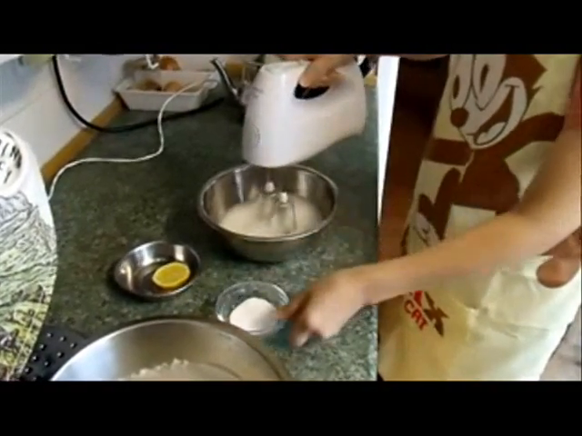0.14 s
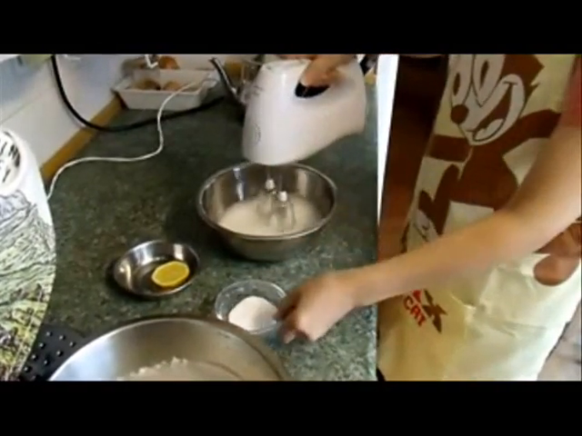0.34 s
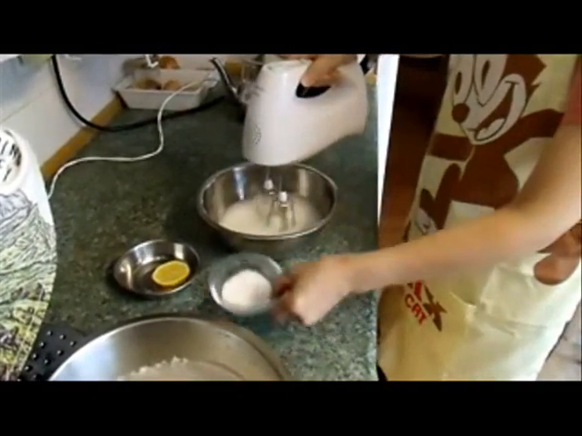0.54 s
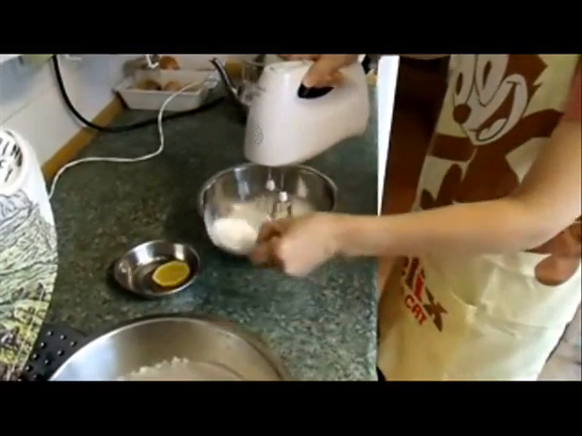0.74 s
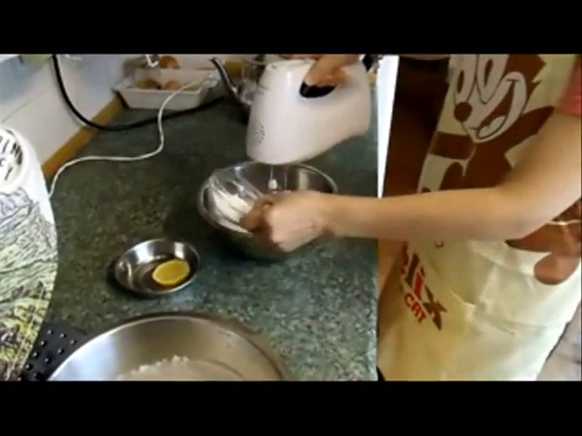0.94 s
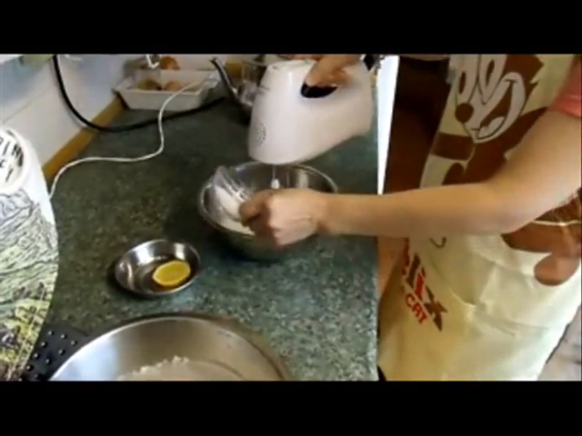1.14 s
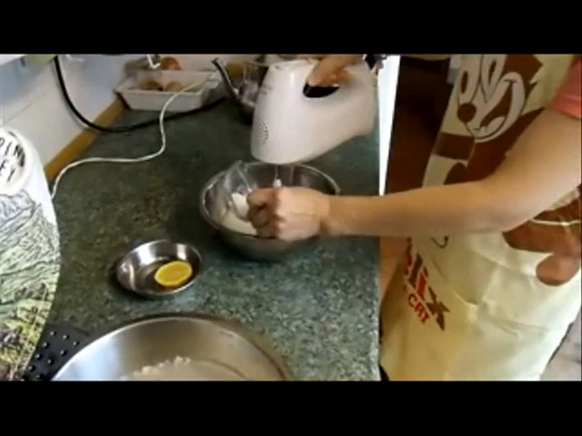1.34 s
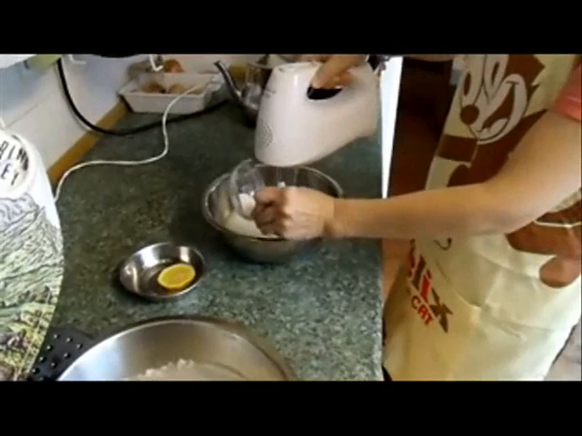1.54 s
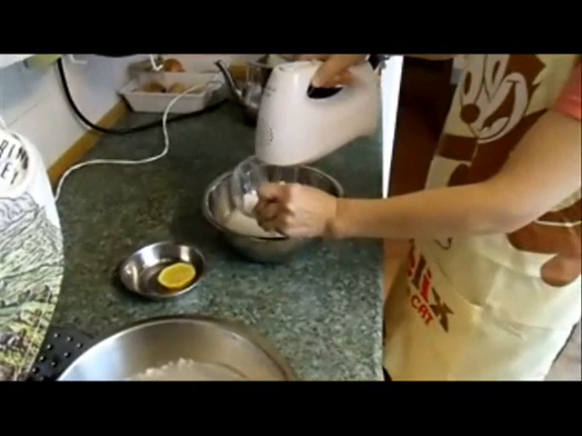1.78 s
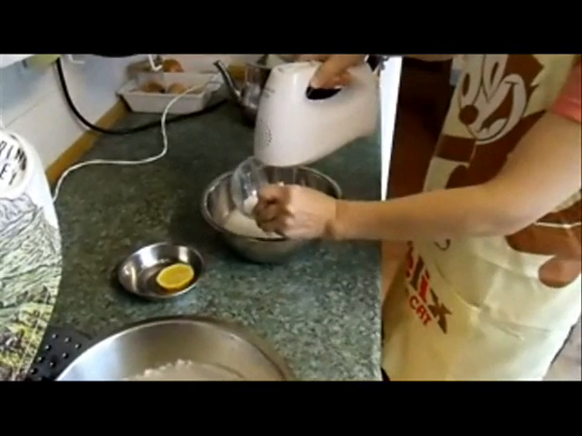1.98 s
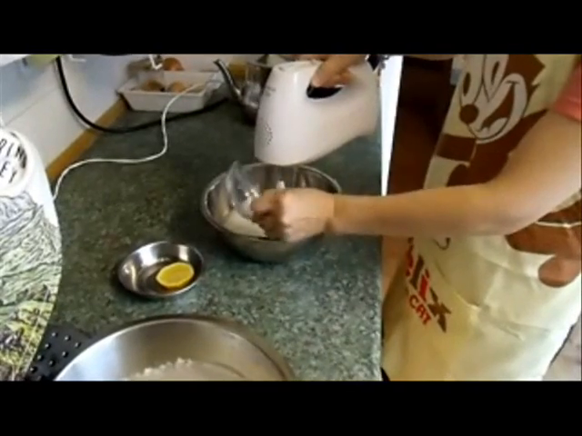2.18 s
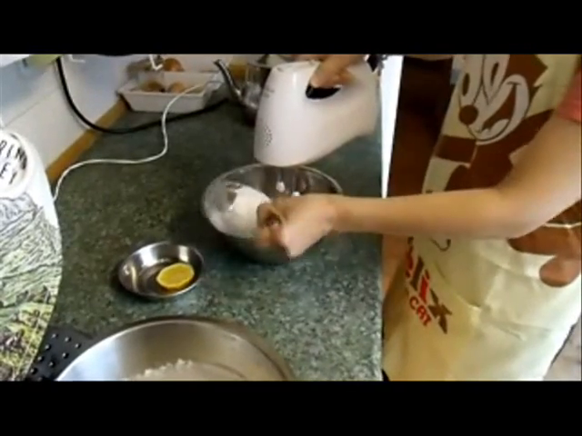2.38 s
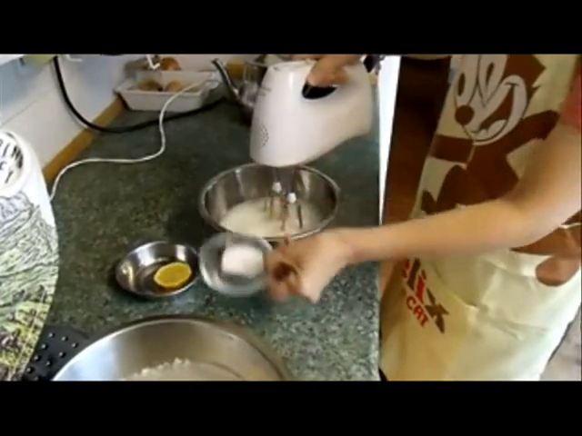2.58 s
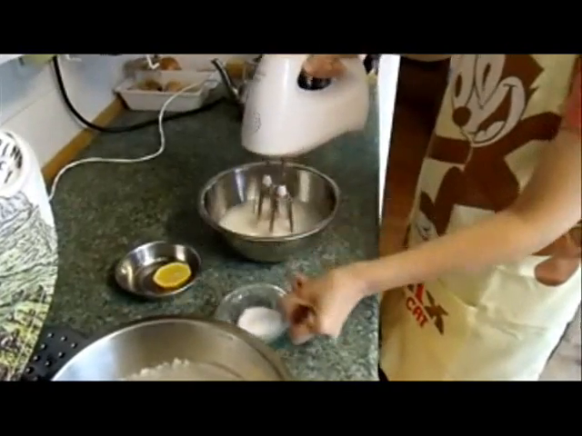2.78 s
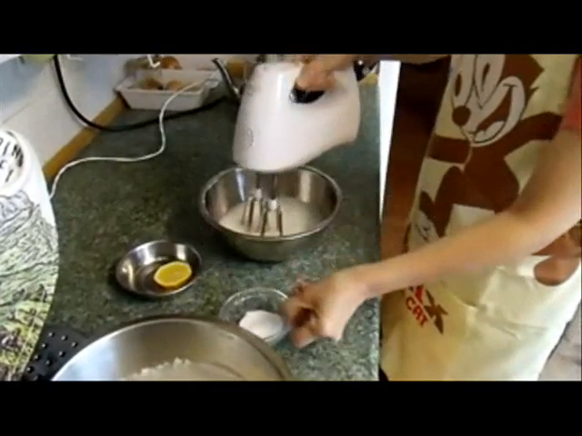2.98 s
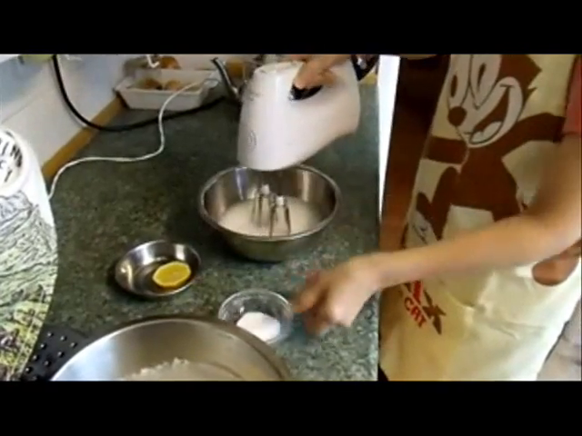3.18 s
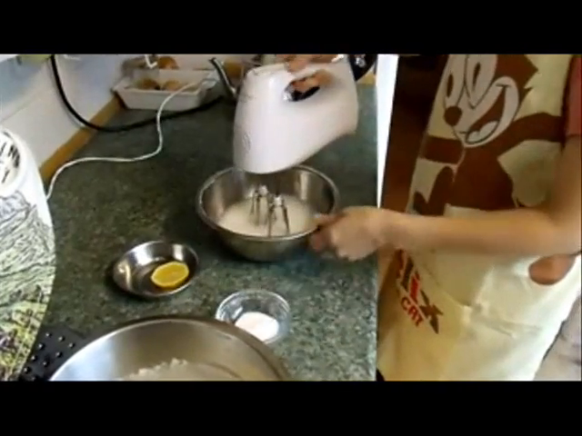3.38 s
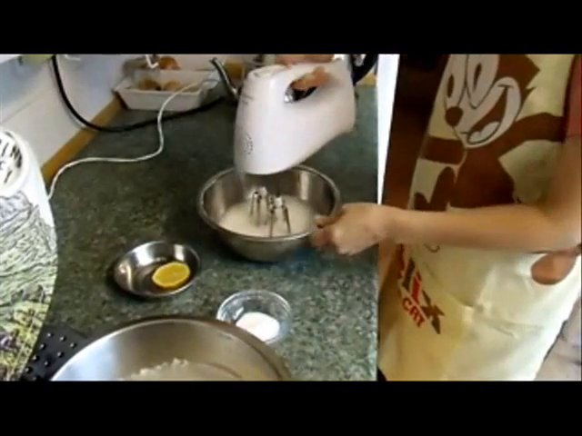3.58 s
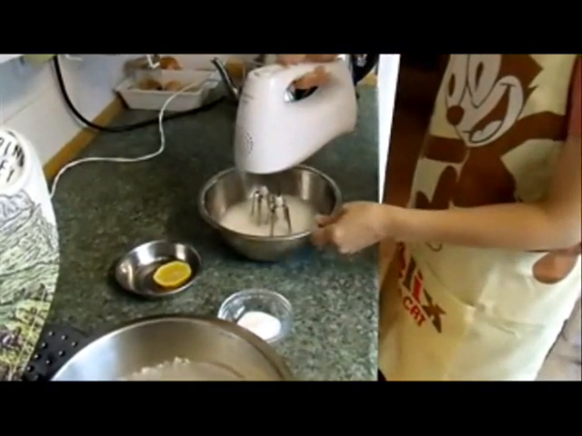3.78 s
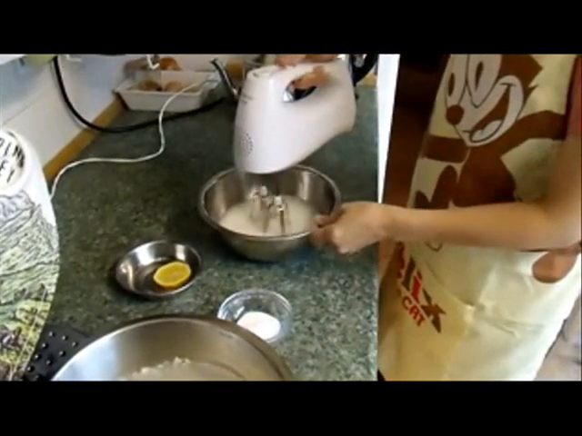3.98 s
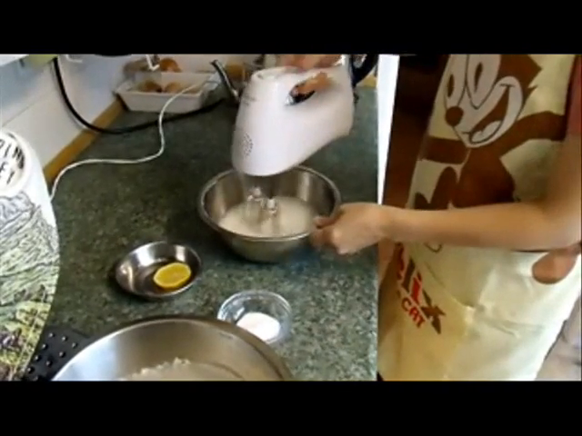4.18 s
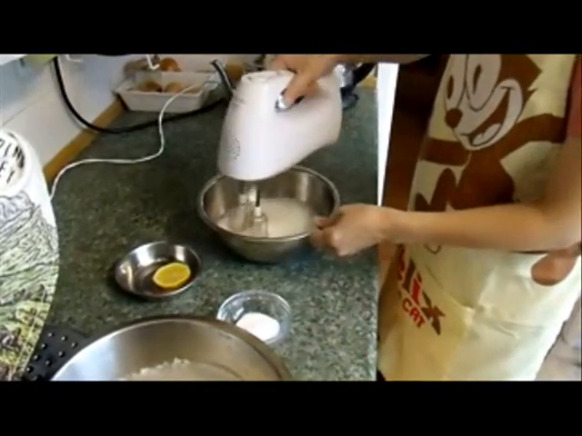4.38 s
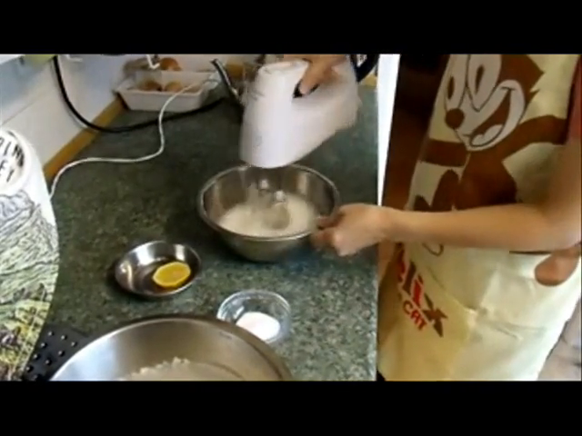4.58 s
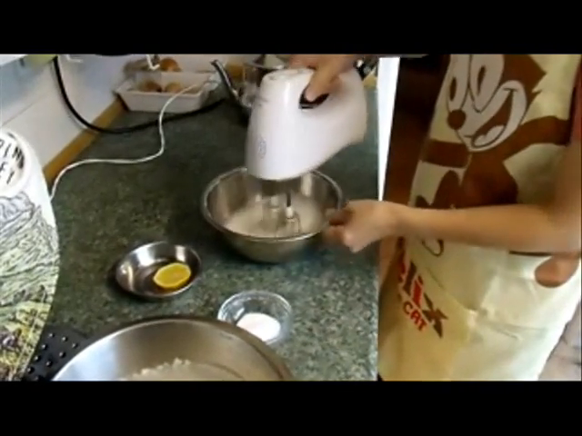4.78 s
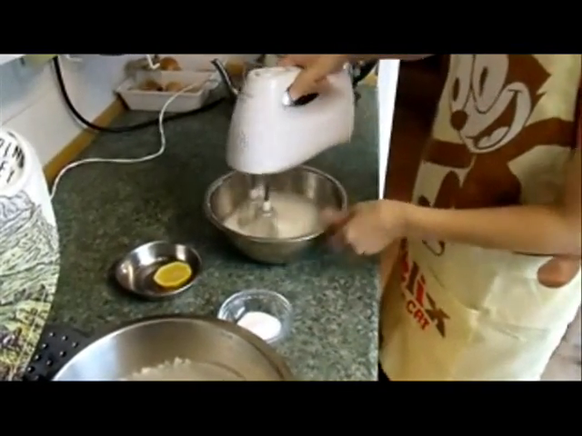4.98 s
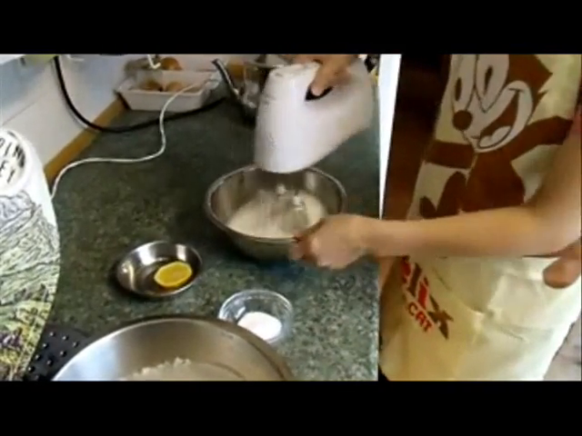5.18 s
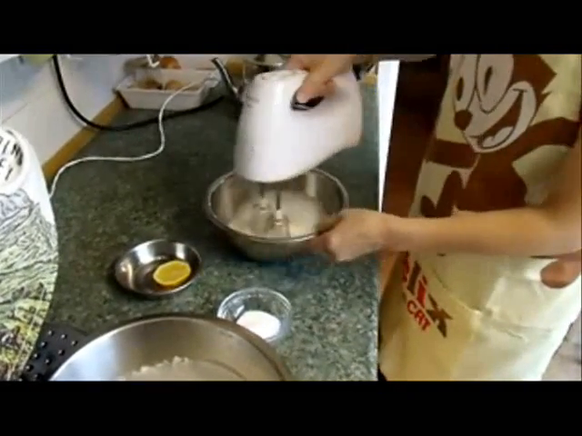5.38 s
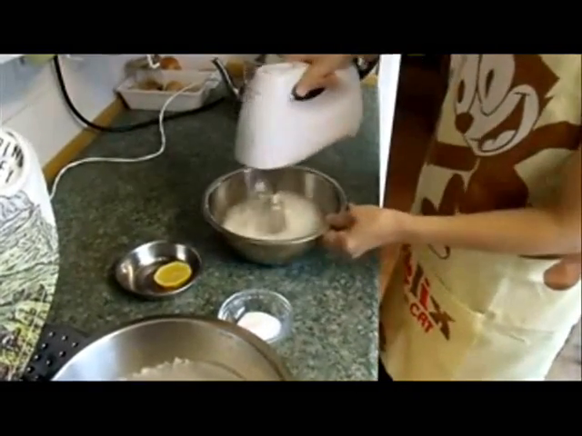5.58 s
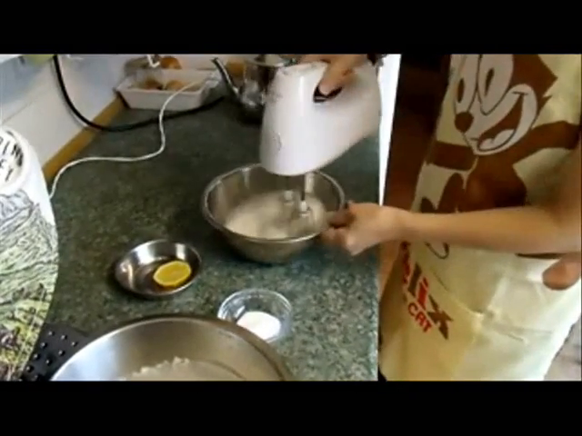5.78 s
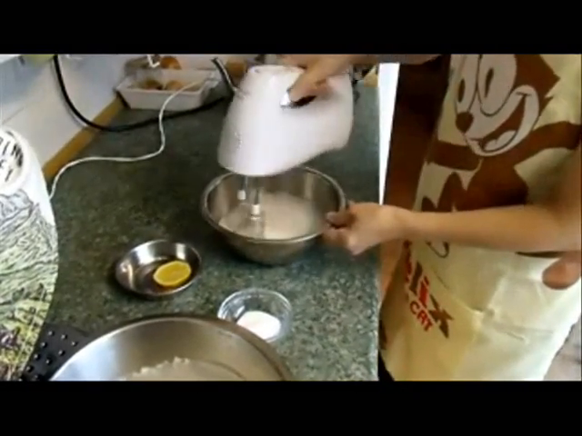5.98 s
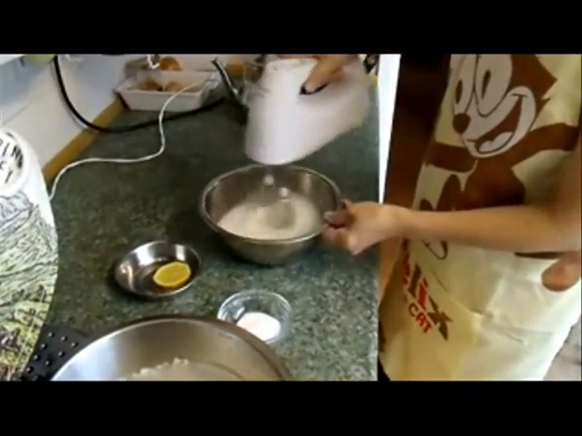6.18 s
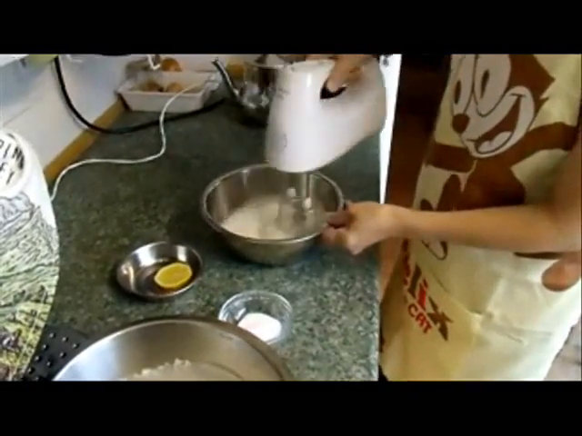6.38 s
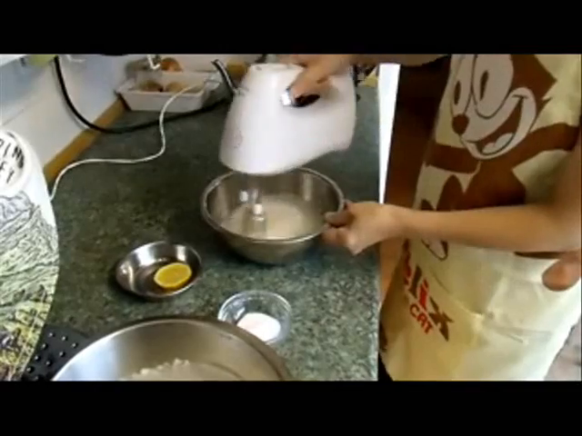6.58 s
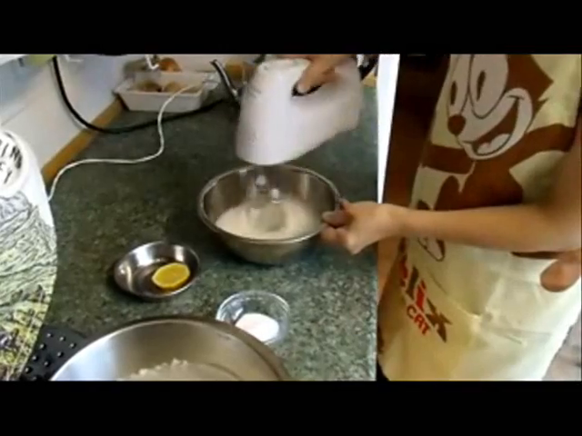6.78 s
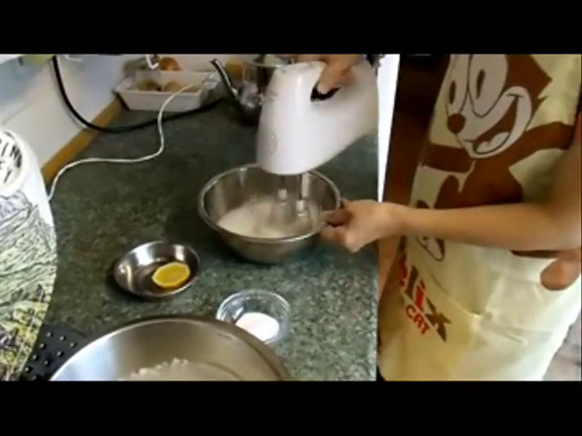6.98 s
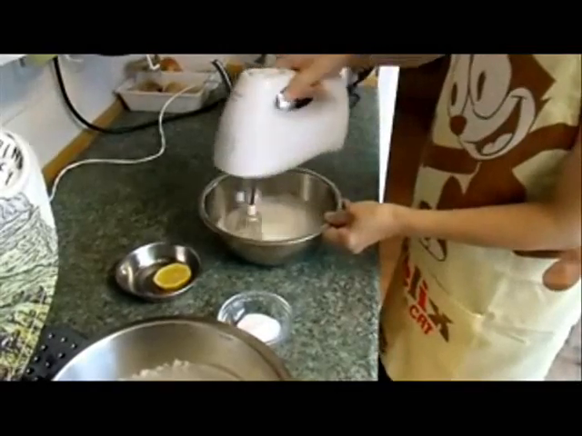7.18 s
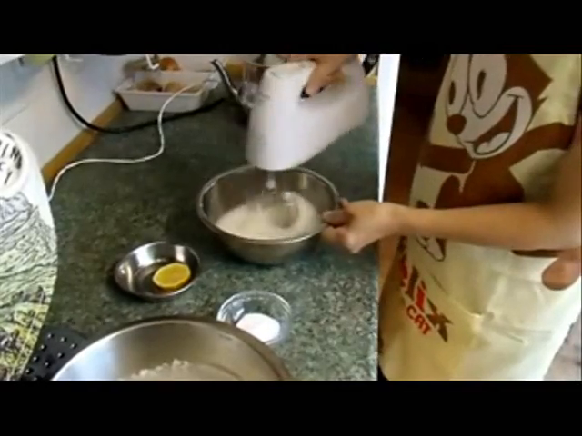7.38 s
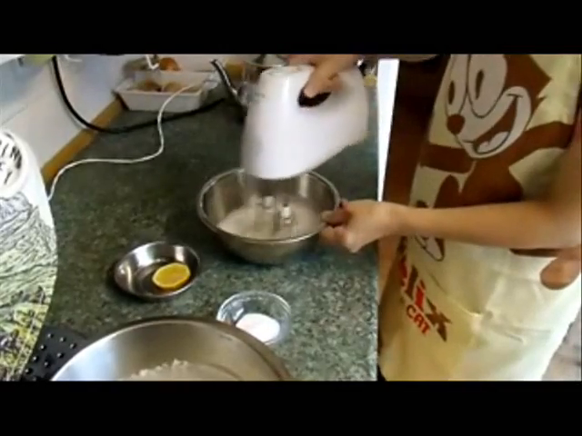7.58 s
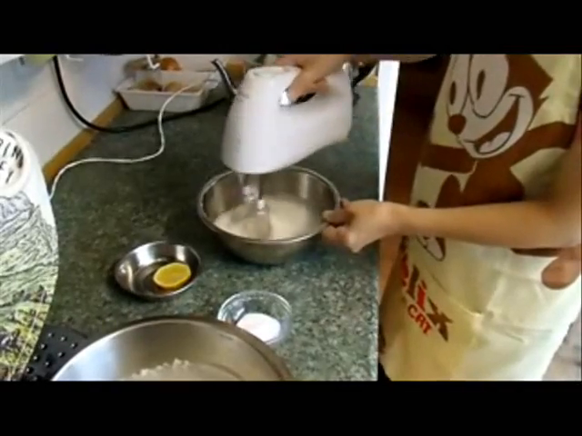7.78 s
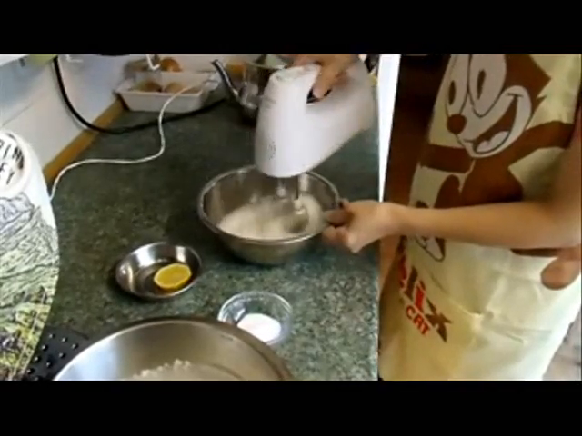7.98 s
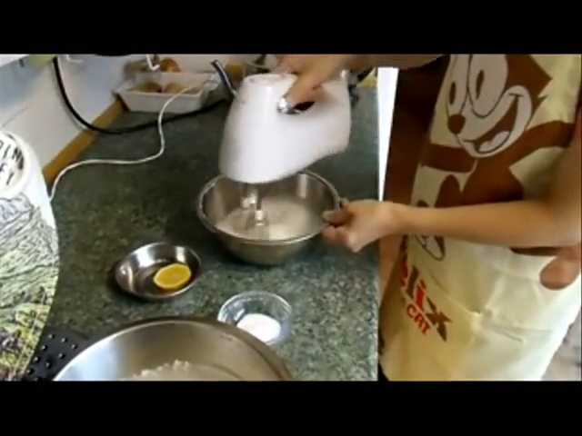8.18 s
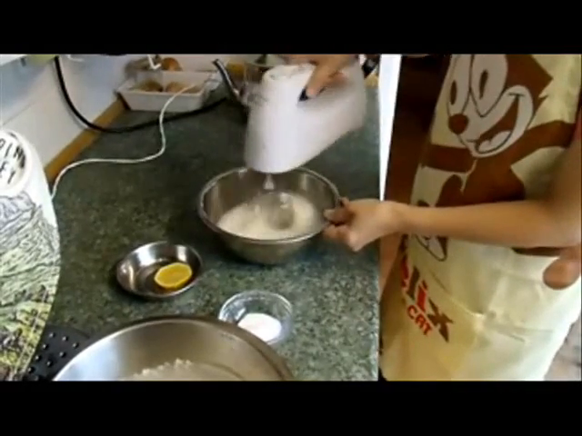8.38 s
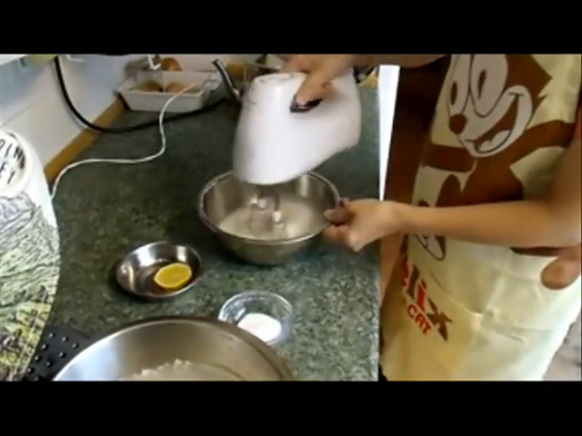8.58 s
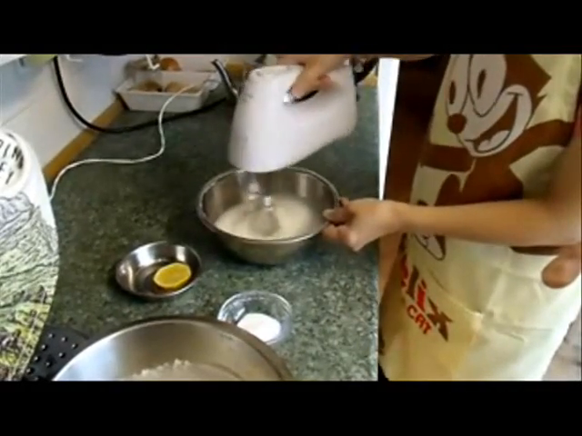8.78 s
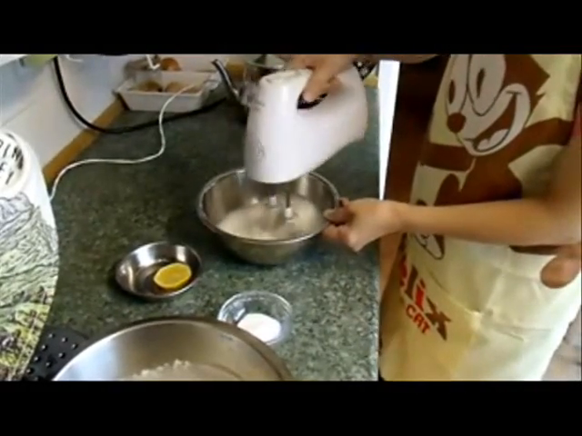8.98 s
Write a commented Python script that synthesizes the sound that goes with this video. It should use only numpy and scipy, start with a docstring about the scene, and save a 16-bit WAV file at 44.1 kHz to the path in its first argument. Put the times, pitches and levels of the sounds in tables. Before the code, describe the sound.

Close in a small hard-walled kitchen, an electric hand mixer coasts down, its buzzy whine falling to nothing with soft bowl taps. A quiet gap with faint hum follows, then a glass dish knocks down on the counter with a fine sugar hiss. The mixer restarts with a gear jolt, climbs quickly to a loud, high whine, and its beaters clatter in irregular bursts against a ringing steel bowl until the end.

```python
"""In a kitchen, close to the worktop: an electric hand mixer coasts to a stop over a steel bowl.
A glass dish of sugar is set down, then the mixer whines up again and its beaters clatter in bursts.
Commutator tones and brush noise follow one speed curve; blows are shaped noise through resonances.
Hum, room air and a short hard-walled reverberation lie behind; the close microphone overloads on the loudest blows."""
import sys
import numpy as np
from scipy import signal
from scipy.fft import rfft, irfft, next_fast_len
from scipy.io import wavfile
from scipy.ndimage import map_coordinates

SR = 44100
rng = np.random.default_rng(int(sys.argv[2]) if len(sys.argv) > 2 else 0)


def put_to_file(sound):
    """Save the sound as 16-bit audio at rate SR, in the file named by the first command-line argument."""
    columns = np.atleast_2d(sound).T  # one column per channel
    safe = np.clip(columns, -1, 1)
    whole_steps = np.round(safe * 32767)
    wavfile.write(sys.argv[1], SR, whole_steps.astype(np.int16))


N = 398663
TIME = np.arange(N) / SR  # seconds
TOP_HZ = 15750  # the microphone's band limit

# Levels in tables are relative: the functions below add offsets or scale the layer.
# Room air spectrum: pitch_hz, level_db (per Hz)
AIR_SPECTRUM = [(25, -18), (66, -7.5), (100, -21), (150, -3), (200, -9), (317, -11.5), (531, -5.5),
                (624, -7), (1290, -14.5), (1610, -10.5), (2400, -11), (3400, -15), (4300, -21.5),
                (6500, -22.5), (10000, -28), (16000, -28.5)]
# Steady kitchen hum and a thin electrical whistle: pitch_hz, level_db
HUM_TONES = [(100, -53.5), (199.5, -57), (516, -58), (537, -49.5), (931, -56.5), (1486, -57), (2350, -57),
             (3408, -60), (11719, -56.5)]
# Reverberation of the kitchen: pitch_hz, t60_s
KITCHEN_DECAY = [(150, 0.54), (1500, 0.34), (6000, 0.37), (15000, 0.67)]

# Motor coasting without power: time_s, commutator_hz
COAST_SPEED = [(0, 2189), (.348, 1706), (.732, 1192), (1.094, 745), (1.304, 510), (1.68, 20)]
# Motor under power: time_s, commutator_hz
DRIVE_SPEED = [(4.06, 100), (4.12, 750), (4.21, 1530), (4.31, 2060), (4.38, 2300), (4.6, 2720), (4.8, 3000),
               (5.0, 3170), (5.2, 3280), (5.6, 3430), (7.3, 3610), (9.04, 3665)]
# Brush noise spectrum while coasting: pitch_hz, level_db (per Hz)
COAST_SPECTRUM = [(60, -19), (250, -9), (480, 1), (900, 1.5), (1700, 3.5), (2250, 0), (2600, -13),
                  (3300, -5), (4500, -5), (6200, -10), (7200, -6), (10200, -13.5), (12500, -7.5),
                  (16000, -18)]
# Brush noise spectrum under power: pitch_hz, level_db (per Hz)
DRIVE_SPECTRUM = [(60, -40), (250, -7), (480, 0), (900, -1.5), (1700, 3.5), (2250, 4.5), (2600, -7),
                  (3200, -2.5), (4400, -1), (6200, -11.5), (7200, -6.5), (10200, -15), (12500, -10.5),
                  (16000, -22)]
# Housing response that the commutator tones sweep through: pitch_hz, level_db
HOUSING_RESPONSE = [(200, -14), (900, 3.5), (1700, -7), (2200, 4.5), (2650, -12), (3300, 0.5), (4600, 2.5),
                    (5600, -2.5), (6200, -7.5), (7200, -0.5), (10000, -9.5), (11000, -7.5), (13000, -7),
                    (16000, -14)]
# Resonances of the mixer's plastic shell: pitch_hz, width_hz, level_db
SHELL_MODES = [(474, 110, -1.5), (1160, 30, 1.5), (1680, 220, -5.5), (2250, 260, -6.5), (2780, 78, 2),
               (3070, 95, 4), (3274, 93, -1.5), (4340, 400, 2), (4680, 84, 5.5), (5630, 180, 4),
               (7040, 190, 1.5), (9040, 160, 3.5), (10700, 100, -11), (13100, 250, -11)]
# Thin ring of the beater wires: pitch_hz, width_hz, level_db
WIRE_MODES = [(4060, 150, 5), (4660, 150, 5), (3500, 140, -2)]

# Light taps and scuffs on the bowl, the dish and the switch: start_s, level_db, treble_db, rise_s
TAP_TIMES = [(1.227, -16.5, 0, .004), (1.3, -13.5, -6, 0.0096), (1.367, -22, -1, .005),
             (1.458, -14, -7, 0.0063), (2.539, -28, -1, .001), (2.79, -23, -8, .005),
             (3.17, -4.5, -4, 0.0083), (3.42, -19.5, 3, .002), (3.433, -15, 1, 0.0047),
             (4.059, -12, -4, .002)]
# Light scuffs on steel and glass: pitch_hz, level_db (per Hz)
SCUFF_SPECTRUM = [(1500, -27), (3000, 2), (4200, 6), (5500, -1), (6500, -3), (7700, 1), (10500, -11),
                  (12500, -6), (16000, -17)]

# Glass dish rocking onto the counter: start_s, level_db
DISH_KNOCKS = [(3.026, 2), (3.085, 0), (3.11, -3), (3.123, -7), (3.241, -5), (3.248, 2)]
# The counter's answer to the dish: pitch_hz, level_db (per Hz)
KNOCK_SPECTRUM = [(30, -39), (150, -18), (300, -12), (400, -15), (550, -14), (740, -2.5), (950, -5.5),
                  (1100, 0), (1400, -5), (1750, -4), (2120, -8), (2450, -23), (3300, -22.5), (4200, -36),
                  (5150, -36), (7000, -37), (16000, -55)]
# Bright snap of the glass: pitch_hz, level_db (per Hz)
GLASS_SPECTRUM = [(500, -20), (3000, -6), (4200, -6), (5200, 0), (6500, -8), (12000, -23), (16000, -18)]
# Counter resonances under the dish: pitch_hz, width_hz, level_db
COUNTER_MODES = [(310, 61, -2), (800, 95, 1), (1140, 37, 2), (1440, 35, -5), (1710, 73, -9), (2110, 75, -6)]
# Counter shuddering under the hands: start_s, level_db, rise_s
COUNTER_THUDS = [(3.19, -28, .012), (3.25, -40, .008), (3.4, -43, 0.045)]
# Low thud of the counter: pitch_hz, level_db (per Hz)
THUD_SPECTRUM = [(20, -2), (45, -10), (90, -3.5), (170, -7), (300, -29), (800, -56)]
# Sugar grains sliding in the dish: pitch_hz, level_db (per Hz)
SUGAR_SPECTRUM = [(4000, -25), (6500, -7), (9000, 2), (10800, -8), (13200, -2), (16000, -13)]

# Gear rattle: pitch_hz, level_db (per Hz)
GEAR_SPECTRUM = [(100, -32), (330, -31), (500, -3.5), (760, -5), (1100, -5.5), (2100, -1), (2600, -16.5),
                 (4500, -15.5), (7000, -24), (16000, -35)]
# Beaters stirring along the bottom of the bowl: time_s, contact_db
STIR_CONTACT = [(4.44, -21), (4.6, -24.5), (4.79, -33), (5.1, -27), (5.28, -35), (5.5, -22.5),
                (6.45, -25.5), (6.7, -26), (7.6, -30), (8.0, -26.5), (8.25, -21), (8.55, -28.5),
                (9.04, -31.5)]
# Beaters pushed against the bowl's wall: start_s, length_s, body_db, edge_db
WALL_BURSTS = [(4.451, 0.043, -14, -20), (4.495, 0.018, -11, -17.5), (4.701, .03, -20, -24.5),
               (4.827, 0.078, -12, -19), (4.958, .005, -16, -20.5), (4.995, 0.0078, -13, -19.5),
               (5.066, 0.032, -17.5, -24), (5.382, 0.029, -12.5, -20.5), (5.434, 0.036, -13.5, -17.5),
               (5.568, 0.028, -14.5, -21.5), (5.649, 0.0069, -15, -20), (5.695, .075, -17.5, -22),
               (5.823, 0.035, -16.5, -24), (5.894, 0.015, -14.5, -15.5), (5.962, 0.03, -11, -16),
               (6.047, 0.016, -12.5, -19.5), (6.113, 0.027, -17, -16.5), (6.191, 0.11, -20.5, -22),
               (6.314, 0.12, -15.5, -20.5), (6.453, .075, -15, -19.5), (6.569, 0.014, -13, -16.5),
               (6.637, 0.013, -13.5, -15), (6.767, 0.0072, -15.5, -16), (6.833, 0.1, -18, -21),
               (6.975, 0.012, -17.5, -21), (7.014, 0.012, -13.5, -18), (7.079, 0.012, -14, -17),
               (7.134, 0.019, -12.5, -17), (7.216, .02, -14.5, -23), (7.306, 0.0099, -10.5, -18.5),
               (7.41, 0.1, -19.5, -22.5), (7.536, 0.083, -15.5, -20), (7.653, 0.014, -13, -17.5),
               (7.72, 0.017, -14, -20.5), (7.771, 0.0091, -21, -25), (7.831, .005, -17, -19.5),
               (7.85, 0.014, -14, -19.5), (8.007, 0.017, -25.5, -23.5), (8.152, 0.0094, -10, -17),
               (8.204, 0.02, -20.5, -25), (8.329, .04, -17.5, -23.5), (8.599, 0.041, -15, -21.5),
               (8.645, 0.015, -12.5, -19.5), (8.713, .005, -25, -25), (8.829, 0.012, -21, -29)]
# Dull contact with the bowl: pitch_hz, level_db (per Hz)
CLATTER_SPECTRUM = [(40, -44), (85, -52), (115, -13.5), (200, -15), (330, -9), (480, -2.5), (900, -2),
                    (1200, -3.5), (2200, -4.5), (2600, -12), (4300, -8.5), (6000, -22.5), (9000, -35)]
# Bright edge of blade on steel: pitch_hz, level_db (per Hz)
STEEL_SPECTRUM = [(2000, -22), (4000, 8.5), (5200, 3.5), (6200, -2), (7200, 4.5), (9200, 5.5),
                  (10200, -3.5), (12000, 3.5), (13300, 3.5), (16000, -9)]
# Resonances of the steel bowl: pitch_hz, width_hz, level_db
BOWL_MODES = [(133, 13, 2), (174, 34, -3), (297, 23, -1), (379, 18, -5), (457.5, 10.5, 10.5),
              (496, 17, 0.5), (562.4, 34, 6.5), (632, 90, -0.5), (762.6, 17.7, 7), (923, 33, 2.5),
              (979, 27, -7.5), (1318, 25, -1.5), (1446, 43, -9), (1590, 50, -6), (1806, 34, 0),
              (1995, 29, 0.5)]

# Coasting: brush noise at the speed where the coast begins, its loss per halving of that speed,
# overtones and lowest tone relative to it
COAST_DB, SLOWING_DB, FREE_SONG_DB, FREE_WHINE_DB = -26.5, 4.5, -5, -6
# Under power: brush noise at top speed, its loss per halving of speed, overtones relative to it
BRUSH_DB, RUN_UP_DB, DRIVEN_SONG_DB = -21.5, 5, -15
SONG_PULL_DB = 8  # added to driven overtones per halving of speed, up to half a halving
# Lowest tone under power: loud while pulling hard, dropping as the speed passes EASE_HZ
PULL_WHINE_DB, CRUISE_WHINE_DB, EASE_HZ, EASE_WIDTH_HZ = -14.5, -36, 2470, 43
# Beater wires: moment they ring most, level, swell and fade
DRAG_S, DRAG_DB, DRAG_SWELL_DB_PER_S, DRAG_FADE_DB_PER_S = 1.0, -32, 22, 13
TOUCH_HZ = 1900  # soft contacts excite little above this
# Sugar: start, level, swell, decay in seconds
SUGAR_S, SUGAR_DB, SUGAR_RISE_S, SUGAR_T60 = 3.22, -35, 0.078, .4
# Gears taking up slack: start, swell, level and decay, then the rattle that lingers
JOLT_S, JOLT_RISE_S, JOLT_DB, JOLT_T60, SETTLE_DB, SETTLE_T60 = 4.055, 0.068, -7, 0.14, -17.5, 1.2
BARS_PER_PASS = 63  # commutator bars that go by between two blade passes
# Fade as the beaters leave the wall, blade-to-blade scatter, grazing first blade of a burst
RELEASE_DB_PER_S, STRIKE_SCATTER_DB, FIRST_TOUCH_DB = 444, 1.15, -0.5
STRIKE_DB, SCRAPE_DB, EDGE_DB = 2.5, -4, 5.5  # knock, scrape and bright edge of each strike


def amp(db):
    """Decibels to gain."""
    return 10 ** (np.asarray(db) / 20)


def unit(x):
    """Scale to rms 1."""
    return x / np.sqrt(np.mean(x ** 2) + 1e-20)


def along(points, hz):
    """Interpolate (Hz, value) points on a log frequency axis."""
    f, v = np.transpose(points)
    return np.interp(np.log(hz + 1), np.log(f + 1), v)


def curves(rows):
    """One value per sample for each column after the time."""
    s, *cols = np.transpose(rows)
    return [np.interp(TIME, s, c) for c in cols]


def during(rows):
    """1 within the time span of a table, with short ramps outside it."""
    inside_s = np.minimum(TIME - rows[0][0], rows[-1][0] - TIME)
    return np.clip(inside_s / 0.0092 + 1, 0, 1)


def wobble(rate):
    """A smooth random curve, rate knots a second."""
    return map_coordinates(rng.standard_normal(int(N * rate / SR) + 4), [TIME * rate])


def filtered(x, response):
    """Filter x by a complex response of frequency."""
    size = next_fast_len(N + SR // 2)
    return irfft(rfft(x, size) * response(np.fft.rfftfreq(size, 1 / SR)), size)[:N]


def noise(spectrum):
    """Coloured noise of rms 1."""
    white = rng.standard_normal(N)
    return unit(filtered(white, lambda hz: amp(along(spectrum, hz))))


def ring(x, modes):
    """Pass x through a set of parallel resonances."""
    def response(f):
        return sum(amp(db) * 1j * f * width / (center * center - f * f + 1j * f * width)
                   for center, width, db in modes)
    return filtered(x, response)


def blows(rows, t60):
    """Envelope of blows (start_s, level_db, rise_s): each swells, then dies away; powers add."""
    power = np.zeros(N + SR)
    t = np.arange(int(min(t60 + .07, .9) * SR)) / SR
    for s, db, rise in rows:
        decay_db = db - 60 * np.maximum(t - rise, 0) / t60
        power[round(s * SR):][:len(t)] += amp(2 * decay_db) * np.minimum(t / rise, 1) ** 2
    return np.sqrt(power[:N])


def background():
    """Room air with a slightly unsteady hum; the phase of the higher tones wavers more."""
    hum = np.zeros(N)
    for hz, db in HUM_TONES:
        level = amp(db + 5.5 + 2.1 * wobble(3.76))
        hum += level * np.sin(2 * np.pi * hz * TIME + min(hz / 700, .9) * wobble(9))
    return hum + amp(-37.5) * noise(AIR_SPECTRUM)


def throb(turns, sharp):
    """One swell per cycle, rms 1."""
    return unit(np.exp(sharp * np.cos(2 * np.pi * turns)))


def overtones(pitch, flutter_db, slope_db, blur, count):
    """Overtones of the commutator, swelling as they sweep through the housing's resonances."""
    phase = 2 * np.pi * np.cumsum(pitch) / SR
    out = np.zeros(N)
    for k in range(2, count):
        gain_db = along(HOUSING_RESPONSE, k * pitch) + flutter_db * wobble(24) - slope_db * np.log2(k)
        tone = np.sin(k * phase + blur * wobble(140))
        out += amp(gain_db) * (k * pitch < TOP_HZ) * tone
    return out


def motor(speed):
    """Brushes hiss and sing on the commutator, louder with speed; under load the lowest tone stands out."""
    halvings = np.log2(speed.max() / speed)
    coast_halvings = np.log2(speed[0] / speed)
    pitch = speed * (1 + .001 * wobble(30) + .002 * wobble(250))
    bars = np.cumsum(pitch) / SR
    rotor = throb(bars / 12, sharp=.2)
    mains = throb(100 * TIME, sharp=.18)
    # the brushes chatter, which roughens the lowest tone
    whine = unit(np.sin(2 * np.pi * bars + .6 * wobble(420)) * amp(4.5 * wobble(170)))

    free_song = overtones(pitch, flutter_db=3.5, slope_db=.1, blur=.35, count=12)
    free_whine_db = FREE_WHINE_DB + 1.7 * along(HOUSING_RESPONSE, speed) - 5 * coast_halvings
    coasting = noise(COAST_SPECTRUM) + amp(FREE_SONG_DB) * free_song + amp(free_whine_db) * whine
    coasting = amp(COAST_DB - SLOWING_DB * coast_halvings) * coasting

    driven_song = overtones(pitch, flutter_db=3, slope_db=-2, blur=1, count=8)
    song_db = DRIVEN_SONG_DB + SONG_PULL_DB * np.minimum(halvings, .5)
    load = (1 - np.tanh((speed - EASE_HZ) / EASE_WIDTH_HZ / 2)) / 2
    whine_db = load * PULL_WHINE_DB + (1 - load) * CRUISE_WHINE_DB
    driven_whine = amp(whine_db) * np.minimum(speed / 750, 1) ** 2 * whine
    driven = amp(BRUSH_DB - RUN_UP_DB * halvings) * (noise(DRIVE_SPECTRUM) + amp(song_db) * driven_song)
    driven = driven + driven_whine
    return rotor * (during(COAST_SPEED) * coasting + during(DRIVE_SPEED) * mains * driven)


def worktop(x, spread, count):
    """Nearby counter, wall and bowls return weak early echoes, so sweeping tones flare and fade."""
    echoes = np.zeros(SR // 10)
    delay, size = rng.uniform(.05, 1, count), rng.standard_normal(count)
    echoes[(delay * min(spread, .09) * SR).astype(int)] = size / np.linalg.norm(size)
    return signal.fftconvolve(x, echoes)[:N]


def kitchen(x):
    """Hard walls answer with a diffuse tail whose decay time depends on frequency."""
    hz, t, z = signal.stft(rng.standard_normal(SR // 2), SR, nperseg=256)
    decay = amp(-60 * t / along(KITCHEN_DECAY, hz)[:, None])
    tail = signal.istft(z * decay, SR, nperseg=256)[1]
    delayed = np.pad(x, (200, 0))  # samples before the walls answer
    return signal.fftconvolve(delayed, tail / np.linalg.norm(tail))[:N]


def wires():
    """The beater wires ring faintly, swelling then fading as they drag to a stop."""
    swell_db = DRAG_SWELL_DB_PER_S * (DRAG_S - TIME)
    fade_db = DRAG_FADE_DB_PER_S * (TIME - DRAG_S)
    level_db = DRAG_DB - np.maximum(swell_db, fade_db)
    turning = np.clip((COAST_SPEED[-1][0] - TIME) / .13, 0, 1)
    tone = unit(ring(rng.standard_normal(N), WIRE_MODES))
    return turning * amp(level_db + 1.1 * wobble(40.8)) * tone


def taps():
    """Soft contacts: a dull touch that rings the bowl, and a bright scuff."""
    touch_rows = [(s, db - 8.5, rise) for s, db, treble_db, rise in TAP_TIMES]
    scuff_rows = [(s, db + treble_db - 7.5, rise) for s, db, treble_db, rise in TAP_TIMES]
    touch = blows(touch_rows, t60=.09) * noise(CLATTER_SPECTRUM)
    body = filtered(touch, lambda hz: 1 / (1 + (hz / TOUCH_HZ) ** 4))
    scuff = blows(scuff_rows, t60=0.045) * noise(SCUFF_SPECTRUM)
    return body + amp(-8) * ring(body, BOWL_MODES) + scuff


def dish():
    """Each knock of the glass is a snap and a dense clack that rings the counter; low thuds shake it."""
    impact = blows([(s, db - 6, .0003) for s, db in DISH_KNOCKS], t60=.045)
    rattle = blows([(s, db - 15.5, .004) for s, db in DISH_KNOCKS], t60=0.21)
    clack = np.hypot(impact, rattle) * noise(KNOCK_SPECTRUM)
    snap = amp(-20.5) * impact * noise(GLASS_SPECTRUM)
    thud = blows(COUNTER_THUDS, t60=0.28) * noise(THUD_SPECTRUM)
    return clack + amp(-3.5) * ring(clack, COUNTER_MODES) + snap + thud


def sugar():
    """The grains left in the dish slide with a fine, fading hiss."""
    grains = unit(noise(SUGAR_SPECTRUM) * amp(3.3 * wobble(700)))
    return blows([(SUGAR_S, SUGAR_DB, SUGAR_RISE_S)], t60=SUGAR_T60) * grains


def jolt():
    """The gear train rattles as it takes up its slack, then settles."""
    kick = blows([(JOLT_S, JOLT_DB, JOLT_RISE_S)], t60=JOLT_T60)
    settle = blows([(JOLT_S, SETTLE_DB, JOLT_RISE_S)], t60=SETTLE_T60)
    return np.hypot(kick, settle) * amp(0.95 * wobble(150)) * noise(GEAR_SPECTRUM)


def strikes(speed, count):
    """In a burst one blade hits per pass, then ever more lightly: rows of start_s, body_db, edge_db."""
    rows = []
    for s, length, body_db, edge_db in WALL_BURSTS:
        age = np.arange(count) * BARS_PER_PASS / speed[round(s * SR)]  # seconds into the burst
        shape_db = FIRST_TOUCH_DB * (age == 0) - RELEASE_DB_PER_S * np.maximum(age - length, 0)
        body_swing, edge_swing = shape_db + STRIKE_SCATTER_DB * rng.standard_normal((2, count))
        hits = np.transpose([s + age, body_db + body_swing, edge_db + edge_swing])
        rows += list(hits[shape_db > -20])
    return rows


def beaters(speed):
    """Blades tick along the bowl once per pass and strike hard when pressed to its wall; the bowl rings."""
    contact_db, = curves(STIR_CONTACT)
    passes = np.cumsum(speed / BARS_PER_PASS * (1 + .1 * wobble(40))) / SR
    ticking = unit(np.exp(-2.4 * (passes % 1)) * amp(2.5 * wobble(70)))
    rub = during(STIR_CONTACT) * amp(contact_db) * ticking

    hits = strikes(speed, count=10)
    hard = blows([(s, body_db + STRIKE_DB, .002) for s, body_db, edge_db in hits], t60=.055)
    scrape = blows([(s, body_db + SCRAPE_DB, .008) for s, body_db, edge_db in hits], t60=.08)
    bright = blows([(s, edge_db + EDGE_DB, .002) for s, body_db, edge_db in hits], t60=.055)
    body = np.sqrt(rub ** 2 + hard ** 2 + scrape ** 2) * noise(CLATTER_SPECTRUM)
    # the wire chatters on the steel within each contact
    chatter = unit(noise(STEEL_SPECTRUM) * amp(1.9 * wobble(900)))
    sizzle = np.hypot(amp(-7) * rub, bright) * chatter
    return amp(-1.0) * body + ring(body, BOWL_MODES) + sizzle


def scene():
    """One motor speed drives the whine and the beaters; the room surrounds mixer and handling."""
    speed, = curves(list(COAST_SPEED) + list(DRIVE_SPEED))
    inside = motor(speed)
    casing = amp(-2.0) * inside + amp(-4.0) * ring(inside, SHELL_MODES)
    casing = casing + amp(-9) * worktop(casing, spread=.012, count=24)  # spread in seconds
    mixer = casing + wires() + jolt() + beaters(speed)
    handling = taps() + dish() + sugar()
    room = kitchen(amp(-8.5) * mixer + amp(-3) * handling)
    return (background() + mixer + handling + room)[None]


def record(dry):
    """The microphone rounds off the loudest peaks and keeps nothing above its band limit."""
    clipped = dry[0] / (1 + np.abs(dry[0] / 1.02) ** 5) ** (1 / 5)
    return filtered(clipped, lambda hz: hz < TOP_HZ)[None]


dry = scene()
out = record(dry)
put_to_file(out)
```